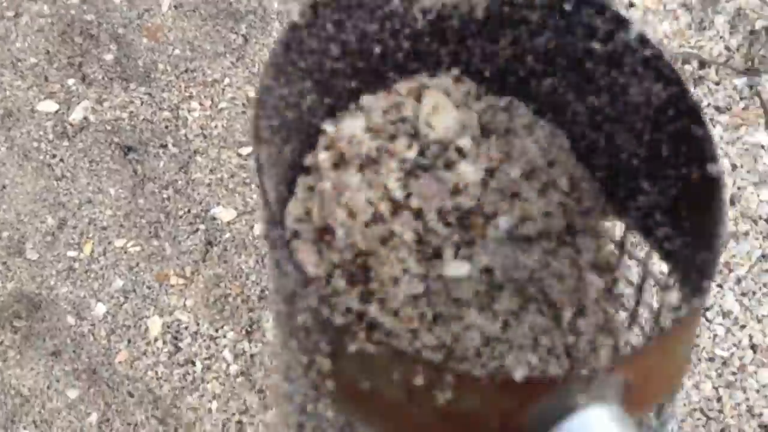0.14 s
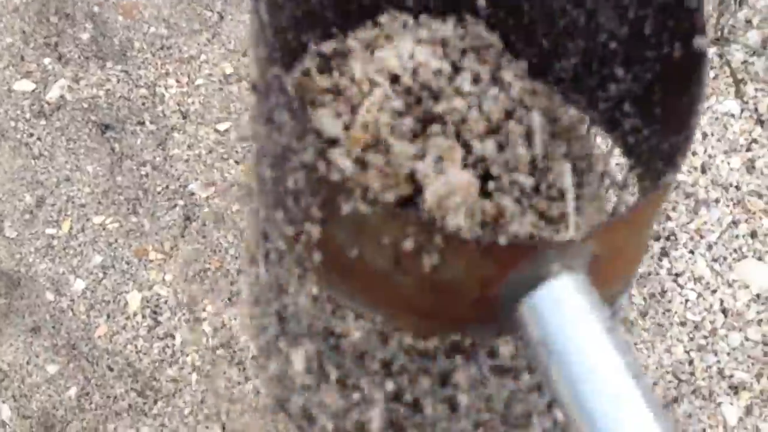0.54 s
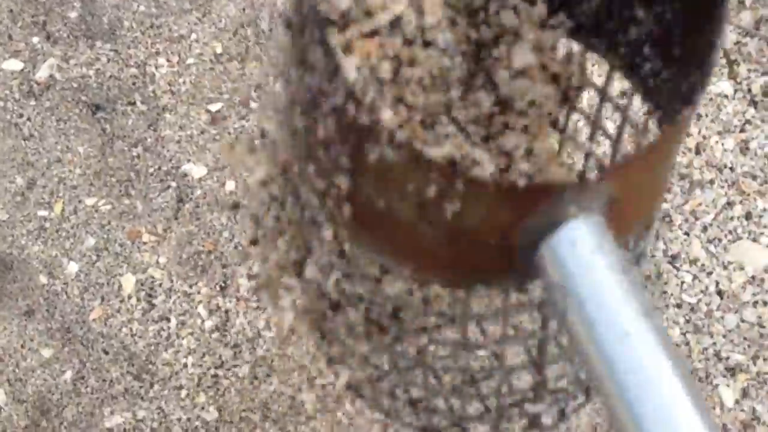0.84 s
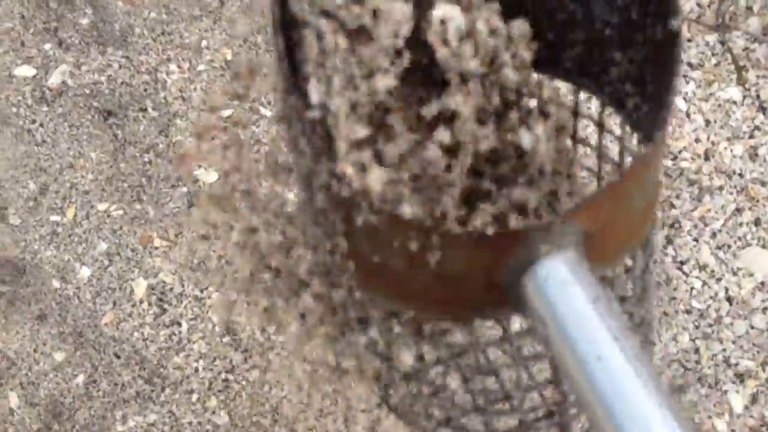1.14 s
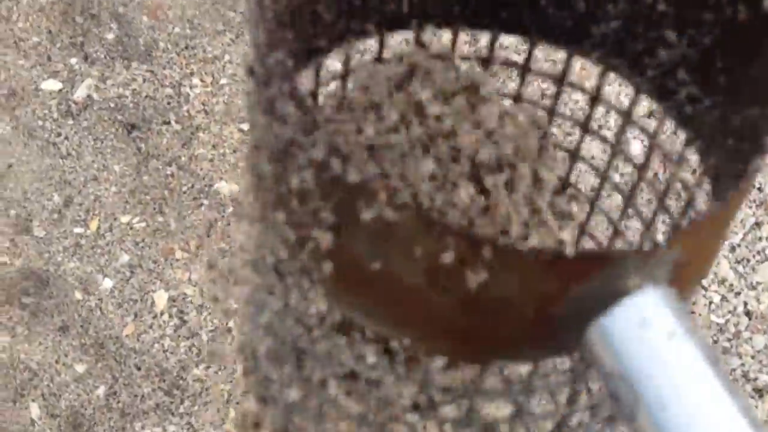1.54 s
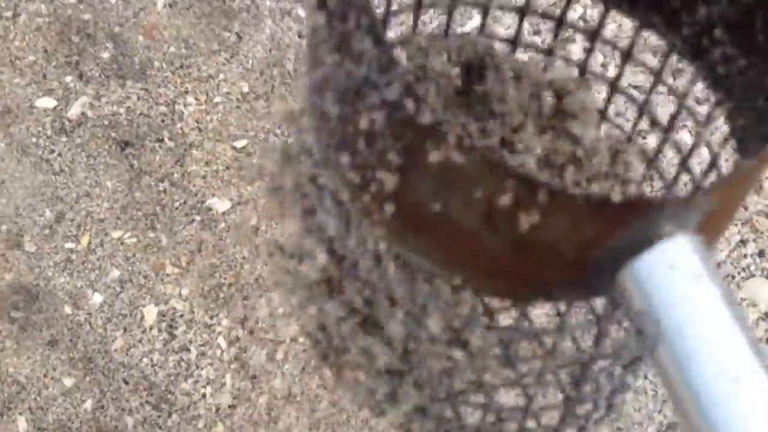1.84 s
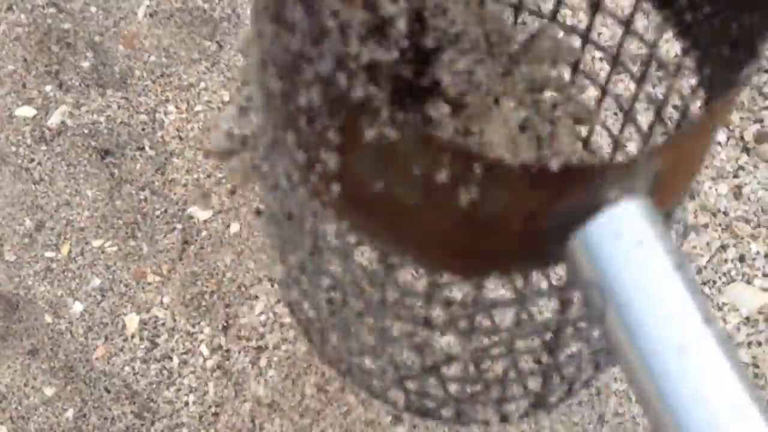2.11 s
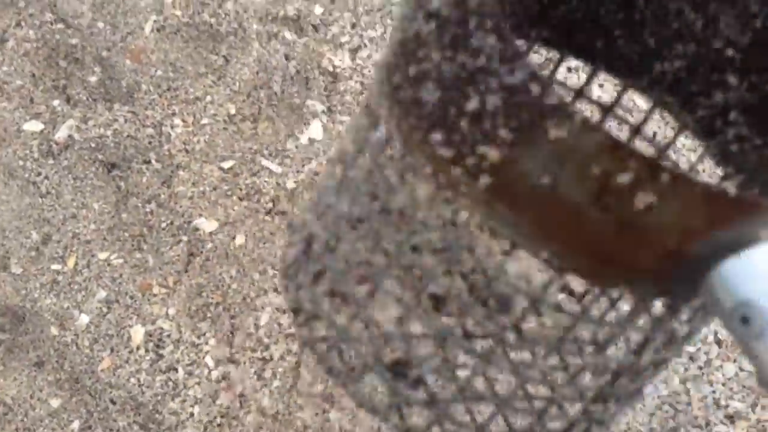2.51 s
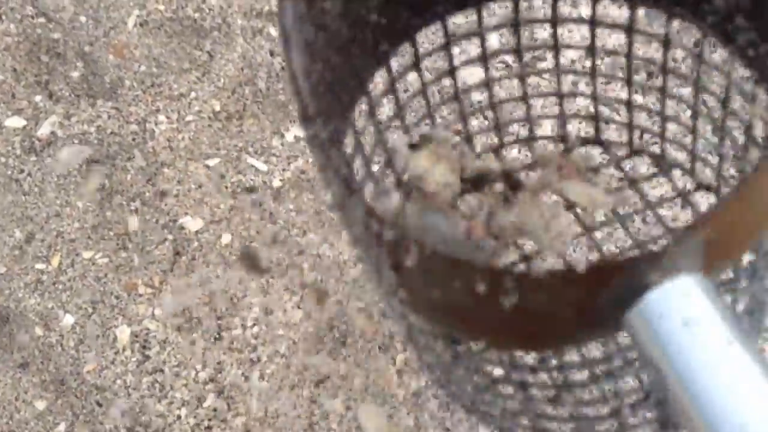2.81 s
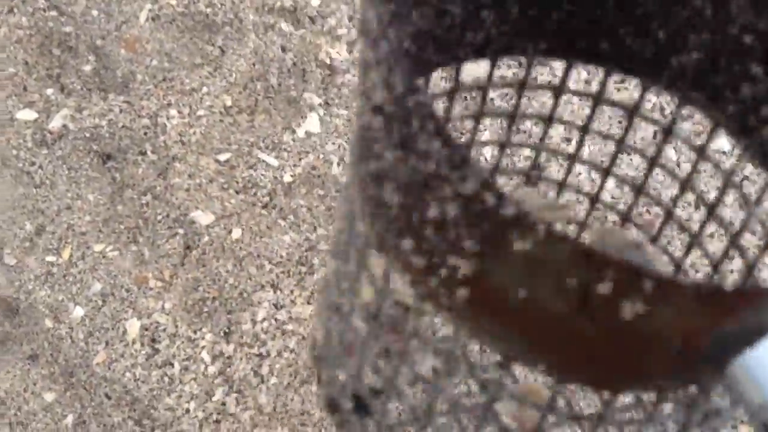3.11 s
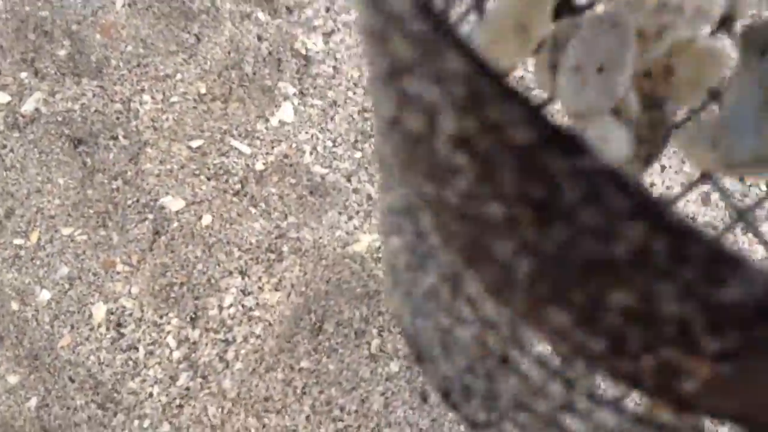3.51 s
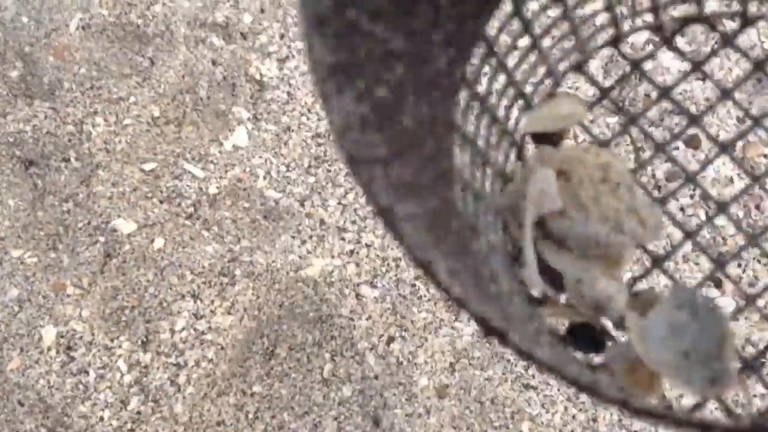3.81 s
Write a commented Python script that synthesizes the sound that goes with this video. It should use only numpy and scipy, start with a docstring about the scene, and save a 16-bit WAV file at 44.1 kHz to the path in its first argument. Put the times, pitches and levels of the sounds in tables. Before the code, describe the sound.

Coarse sand shaken in a steel mesh scoop in crunchy bursts, then shells rattling and clicking

```python
"""Sand and shells in a steel scoop

A steel mesh scoop is shaken close by on a beach. Nine times coarse sand slides back, is thrown against the
mesh and trickles through: dense random grains, coloured and swelled. Then the scoop is tilted and the shells
left in it tumble, as bunched grains and ticks. Fragments click as short modes with a noisy crack, and heavier
pieces knock on the wall. The basket rings faintly; behind lies a low rush of surf and air, as coloured noise.
"""
import sys
import numpy as np
from scipy import signal
from scipy.fft import rfft, irfft, next_fast_len
from scipy.io import wavfile
from scipy.ndimage import map_coordinates

SR = 44100
rng = np.random.default_rng(int(sys.argv[2]) if len(sys.argv) > 2 else 0)


def waveform_to_disk(signal):
    """Save audio, clipped to [-1, 1], as 16-bit WAV at the path in sys.argv[1]."""
    frames = np.transpose(np.atleast_2d(signal))
    scaled = np.clip(frames, -1, 1) * 32767
    samples = np.round(scaled).astype(np.int16)
    wavfile.write(sys.argv[1], SR, samples)


N = 174195  # length in samples

# Levels in the tables come before the layer trims (..._DB) further down.
# throws of sand against the mesh: centre_s, level_db, half_width_s
SAND_THROWS = [(0.102, -20, 0.01), (0.406, -15, 0.012), (.673, -20, 0.011), (0.962, -16.5, .016),
               (1.232, -17, 0.015), (1.504, -19.5, 0.02), (1.738, -17, 0.01), (1.994, -21.5, 0.024),
               (2.262, -20, .021)]
# sand sliding back before each throw: centre_s, level_db, half_width_s
SAND_SLIDES = [(.041, -40, 0.035), (0.32, -31.5, 0.031), (.613, -37.5, 0.036), (0.881, -30, 0.031),
               (1.154, -30, 0.03), (1.427, -31.5, 0.033), (1.663, -28.5, 0.024), (1.902, -33, 0.029),
               (2.165, -35.5, 0.029)]
# loudness of the shells rolling in the tilted scoop: time_s, level_db
TUMBLE_LEVEL = [(2.27, -59), (2.35, -45), (2.41, -28.5), (2.435, -35.5), (2.49, -27.5), (2.57, -37.5),
                (2.597, -30), (2.664, -37), (2.695, -25.5), (2.79, -36), (2.865, -37), (2.925, -31.5),
                (3.0, -31), (3.13, -27.5), (3.29, -29), (3.34, -36), (3.39, -31.5), (3.47, -36.5),
                (3.51, -29.5), (3.565, -35), (3.6, -20), (3.65, -24), (3.735, -26.5), (3.82, -24),
                (3.862, -35.5), (3.9, -27.5), (3.925, -39)]
# single fragments striking the basket: touch_s, peak_db, pitch_hz
FRAGMENT_CLICKS = [(0.0947, -13, 8170), (0.244, -27.5, 8200), (0.3748, -6.5, 7910), (0.3915, -14.5, 6900),
                   (0.442, -14.5, 7840), (0.656, -16, 11800), (0.7439, -14.5, 8100), (0.7563, -19.5, 8950),
                   (0.9305, -9.5, 8100), (0.946, -9, 4620), (1.0003, -12, 9200), (1.0166, -10.5, 7930),
                   (1.0537, -23, 8400), (1.2023, -13, 8060), (1.255, -7, 8800), (1.482, -11, 7660),
                   (1.5115, -10, 7400), (1.546, -10.5, 6450), (1.6127, -19.5, 4610), (1.7093, -14, 8600),
                   (1.718, -12, 8100), (1.902, -15.5, 4850), (1.961, -10, 13000), (1.9793, -8, 8100),
                   (2.089, -23, 3860), (2.2252, -11.5, 8400), (2.4632, -17, 6560), (2.539, -19.5, 2900),
                   (2.5905, -14, 2770), (2.6433, -20.5, 2220), (2.684, -8, 4850), (2.7098, -7, 5880),
                   (2.7192, -8, 8300), (2.761, -21, 3500), (2.833, -11, 11900), (2.9265, -10, 8700),
                   (3.0166, -10.5, 3180), (3.025, -15, 7630), (3.0475, -20, 4850), (3.0606, -14, 8800),
                   (3.085, -17, 4800), (3.1363, -13, 6960), (3.1933, -11, 8900), (3.2615, -15, 6960),
                   (3.295, -20, 6630), (3.392, -20, 3210), (3.422, -14.5, 4770), (3.4486, -24, 3220),
                   (3.4824, -20, 3050), (3.5023, -22, 3190), (3.5236, -9.5, 4400), (3.5625, -23, 4570),
                   (3.5888, -9.5, 6600), (3.6093, -16, 4540), (3.6378, -9, 6360), (3.648, -11, 5950),
                   (3.679, -13.5, 6700), (3.702, -13.5, 6600), (3.755, -11.5, 6660), (3.774, -7, 6720),
                   (3.791, -12, 6400), (3.8133, -15, 3060), (3.8994, -13.5, 8740)]
# heavier pieces knocking on the steel wall: start_s, peak_db, pitch_hz, clack_against_ring_db
WALL_KNOCKS = [(0.965, -32, 930, -2), (1.121, -27, 1940, -4), (1.235, -26.5, 2010, -5),
               (1.512, -25, 1050, 1), (1.546, -20.5, 2200, 4), (1.739, -29, 1070, -11),
               (2.01, -25, 2040, -3), (2.271, -24, 1100, -7), (2.681, -26, 1980, -15),
               (3.017, -20.5, 3300, -5), (3.524, -26.5, 1850, -8), (3.641, -27, 2010, -9),
               (3.815, -21.5, 2040, -6)]
# ways the steel scoop vibrates: pitch_hz, level_db, t60_s (time to fall by 60 dB)
SCOOP_MODES = [(940, -5.5, 0.057), (1080, -2.5, 0.098), (1450, -7, 0.045), (2015, 3, 0.056),
               (2380, -7.5, 0.032), (2850, -1.5, 0.052), (3450, -4.5, 0.027), (4140, 3, 0.022),
               (4800, 7, 0.029)]
# tone colours of the layers: frequency_hz, gain_db
THROWN_SAND_COLOUR = [(300, -33.5), (900, -16.5), (1700, -13.5), (3000, -5.5), (4600, -1.5), (5200, -4.5),
                      (6300, -1), (8200, 3), (10300, -3.5), (12600, 2.5), (15500, -8)]
SLIDING_SAND_COLOUR = [(300, -12), (900, -3), (1700, -6.5), (3000, 0), (4600, 1.5), (5200, 0), (6500, 0),
                       (8200, 3.5), (10300, -2), (12600, 4.5), (15500, -6)]
SHELL_COLOUR = [(150, -45), (400, -11.5), (900, -10.5), (1600, -9.5), (2900, -2), (4400, 1), (5250, -4),
                (6500, -0.5), (8300, -2.5), (10300, -8), (12800, -8), (15500, -16)]
SURF_COLOUR = [(25, -23), (75, -31), (132, -8), (213, 0.5), (355, -1), (517, -3.5), (700, -8), (1170, -10),
               (1980, -120)]
AIR_COLOUR = [(300, -19.5), (700, -7), (1100, 5), (2200, 1), (5000, -16), (15000, -41)]
# loudness of the surf: time_s, level_db
SURF_LOUDNESS = [(0, -44), (1.8, -47), (2.08, -52), (2.6, -49.5), (3.2, -50), (3.7, -45.5), (3.95, -48.5)]
# level of the last grit against the shells: time_s, level_db
GRIT_LEVEL = [(2.3, -2), (3.15, 0.5), (3.35, -11), (3.55, -20), (3.65, -4), (3.95, -11)]

# Surf and air
AIR_DB = -49
SURF_WAVER_DB, SURF_WAVER_PER_S = 0.54, 6.86  # quick swell and ebb of the rush
# Sand
GRAINS_PER_S, GRAIN_SPREAD_DB = 12000, 6
THROW_DB, SLIDE_DB = -1, 1.5
CHIPS_IN_THROW_DB, CHIPS_IN_SLIDE_DB = -9, -6
TRICKLE_DB, TRICKLE_RISE_S, TRICKLE_FALL_S = -7, 0.01, 0.022  # stray grains around each throw
SLIDE_SQUARENESS = 2.26  # above 2 a slide starts and stops more abruptly than a bell curve
# Shell chips
CHIPS_PER_S, CHIP_SPREAD_DB = 500, 3
CHIP_HZ, CHIP_CYCLES = 5460, 3.3  # central pitch; cycles until a tick fades to 37 %
CHIP_MODE_SPREAD, CHIP_PITCH_SPREAD = 0.447, 0.262  # log scatter of pitch within a chip and between chips
CHIP_LIMIT = 1.6  # largest chip, in standard deviations of size
# Tumbling shells
SCRAPE_DB, CHIP_DB = -4.5, -6.5
BUMPS_PER_S, BUMP_FALL_S, BUMP_SPREAD_DB = 130, 0.0047, 3.5  # collisions that bunch the rattle
BUMP_SHARE = 0.62  # part of the power that follows the collisions
# Clicks; crack and ring times are for a piece at the reference pitch
CLICK_T60_S, CRACK_DB, CRACK_T60_S = 0.012, -8, 0.0066
CHATTER_DB, CHATTER_T60_S = -27, 0.032
CLICK_REFERENCE_HZ, CLICK_SIZE_LAW = 7000, 0.43  # bigger pieces sound lower and crack for longer
CLICK_SPREAD, CLICK_DELAY_S = 0.162, 0.001  # log scatter of a fragment's modes; from touch to crack
CLICK_ATTACK_S, CLICK_LOW_HZ = 0.00017, 700  # rise time; bass cut
# Knocks
KNOCK_DB = 1.5
CLACK_LOW, CLACK_HIGH = 0.73, 1.63  # band of a clack, times its pitch
KNOCK_FOCUS_DB, KNOCK_ATTACK_S = 5.5, 0.00087  # loss per octave away from the pitch; rise time
CLACK_T60_S, KNOCK_DAMP_T60_S = 0.019, 0.17  # the piece's own dry clack; the load muffles the ring
# Basket
RING_DB = -15
SHIFT_S, LOAD_DETUNE = 0.1994, 0.021  # the load shifts this often; share by which it detunes the basket
MODE_SPREAD_DB = 2.44  # scatter of the mode levels from one ring to the next
# Limits of the whole sound
LOW_CUT_HZ, TOP_HZ = 80, 15700


def amp(db):
    """Turn decibels into an amplitude factor."""
    return 10 ** (np.asarray(db) / 20)


def unit(x):
    """Scale a sound to rms 1."""
    return x / np.sqrt(np.mean(x ** 2) + 1e-20)


def curve(rows):
    """One value per sample from (time, value) points."""
    return np.interp(np.arange(N) / SR, *np.transpose(rows))


def colour(x, points):
    """Filter a sound to the gains of the (Hz, dB) points, with no echo ahead of it."""
    m = next_fast_len(N + SR // 2, True)
    f, db = np.transpose(points)
    log_hz = np.log(np.fft.rfftfreq(m, 1 / SR) + 1)
    gain = amp(np.interp(log_hz, np.log(f), db))
    # Folding the cepstrum forward in time makes the filter causal (minimum phase)
    cepstrum = irfft(np.log(gain), m)
    cepstrum[1:m // 2] *= 2
    cepstrum[m // 2 + 1:] = 0
    return irfft(rfft(x, m) * np.exp(rfft(cepstrum)), m)[:N]


def decay(t, t60):
    """Exponential fade that falls by 60 dB in t60 seconds."""
    return np.exp(-np.log(1000) * t / t60)


def add(track, s, sound):
    """Mix a sound into the track at time s."""
    part = track[max(round(s * SR), 0):][:len(sound)]
    part += sound[:len(part)]


def beach():
    """A low, wavering rush of surf with a faint airy hiss, both coloured noise."""
    knots = rng.standard_normal(int(N / SR * SURF_WAVER_PER_S) + 4)
    waver = map_coordinates(knots, [np.arange(N) / SR * SURF_WAVER_PER_S])  # smooth path through the knots
    surf = unit(colour(rng.standard_normal(N), SURF_COLOUR))
    air = unit(colour(rng.standard_normal(N), AIR_COLOUR))
    return amp(curve(SURF_LOUDNESS) + SURF_WAVER_DB * waver) * surf + amp(AIR_DB) * air


def scoop_ring(pitch_hz=2000, focus_db=0):
    """One contact's ring: the load detunes the modes, and the spot hit favours those near one pitch."""
    t = np.arange(SR // 6) / SR
    ring = np.zeros(len(t))
    for hz, db, t60 in SCOOP_MODES:
        level = amp(db + rng.normal(0, MODE_SPREAD_DB) - focus_db * abs(np.log2(hz / pitch_hz)))
        detuned_hz = hz * (1 + LOAD_DETUNE * rng.standard_normal())
        ring += level * decay(t, t60) * np.sin(2 * np.pi * (detuned_hz * t + rng.random()))
    return ring


def basket(load):
    """The load drives the basket, which rings a little differently each time the load shifts."""
    out, shifts = np.zeros(N), np.arange(N) / SR / SHIFT_S
    for k in range(int(shifts[-1]) + 2):
        ring = scoop_ring()
        share = np.sqrt(np.maximum(1 - abs(shifts - k), 0))  # crossfade between neighbouring rings
        out += signal.oaconvolve(load * share, ring / np.linalg.norm(ring))[:N]
    return out


def knocks():
    """Heavier pieces clack on the wall and set the loaded basket ringing briefly."""
    out = np.zeros(N)
    for s, db, hz, clack_db in WALL_KNOCKS:
        ring = scoop_ring(hz, KNOCK_FOCUS_DB)
        t = np.arange(len(ring)) / SR
        band = [CLACK_LOW * hz, min(CLACK_HIGH * hz, SR / 3)]
        b, a = signal.butter(2, band, "bandpass", fs=SR)
        clack = unit(signal.lfilter(b, a, rng.standard_normal(len(t))))
        ring = ring / np.abs(ring).max() * decay(t, KNOCK_DAMP_T60_S)
        hit = ring + amp(clack_db) * clack * decay(t, CLACK_T60_S)
        hit = hit * (1 - np.exp(-t / KNOCK_ATTACK_S))
        add(out, s, amp(db + KNOCK_DB) * hit / np.abs(hit).max())
    return out


def clicks():
    """A fragment lands: a crack, short close modes and a little chatter; it is too small to give bass."""
    out, t = np.zeros(N), np.arange(SR // 20) / SR
    grit = unit(colour(rng.standard_normal(N), THROWN_SAND_COLOUR))
    for s, db, hz in FRAGMENT_CLICKS:
        size = (CLICK_REFERENCE_HZ / hz) ** CLICK_SIZE_LAW
        modes_hz = hz * np.exp(CLICK_SPREAD * rng.standard_normal((6, 1)))
        tones = np.sin(2 * np.pi * (modes_hz * t + rng.random(modes_hz.shape)))
        ring = tones.mean(0) * decay(t, CLICK_T60_S * size)
        crack = amp(CRACK_DB) * decay(t, CRACK_T60_S * size)
        chatter = amp(CHATTER_DB) * decay(t, CHATTER_T60_S)
        noise = np.roll(grit, rng.integers(N))[:len(t)]  # a random stretch of the grit
        hit = (ring + (crack + chatter) * noise) * (1 - np.exp(-t / CLICK_ATTACK_S))
        add(out, s + CLICK_DELAY_S, amp(db) * hit / np.abs(hit).max())
    return signal.sosfilt(signal.butter(2, CLICK_LOW_HZ, "highpass", fs=SR, output="sos"), out)


def grains():
    """Dense tiny impacts of unequal size, rms 1."""
    hit = rng.random(N) < GRAINS_PER_S / SR
    sign = np.sign(rng.standard_normal(N))
    size = amp(GRAIN_SPREAD_DB * np.minimum(rng.standard_normal(N), 2))
    return unit(hit * sign * size)


def chips():
    """Shell chips colliding at random, each a dry tick of several unrelated modes, rms 1."""
    count = int(CHIPS_PER_S * N / SR)
    start = rng.integers(0, N, count)[:, None]
    size, pitch, *modes = rng.standard_normal((count, 7)).T[:, :, None]  # five modes per chip
    k = np.arange(SR // 250)
    ticks = 0
    for mode in modes:
        hz = CHIP_HZ * np.exp(CHIP_PITCH_SPREAD * pitch + CHIP_MODE_SPREAD * mode)
        hz = np.clip(hz, 1200, TOP_HZ)
        cycles = hz * k / SR
        level = rng.choice([-1, 1], (count, 1)) * np.sqrt(hz)
        ticks = ticks + level * np.exp(-cycles / CHIP_CYCLES) * np.sin(2 * np.pi * cycles)
    ticks = ticks * amp(CHIP_SPREAD_DB * np.minimum(size, CHIP_LIMIT))
    return unit(np.bincount((start + k).ravel(), ticks.ravel(), N)[:N])  # sum the overlapping ticks


def bumps():
    """Random collisions, each a sudden rise and quick fall of the rattle, rms 1."""
    strength = amp(BUMP_SPREAD_DB * np.minimum(rng.standard_normal(N), 1)) ** 2
    hit = (rng.random(N) < BUMPS_PER_S / SR) * strength
    power = signal.lfilter([1], [1, -np.exp(-1 / (BUMP_FALL_S * SR))], hit)
    return np.sqrt(1 - BUMP_SHARE + BUMP_SHARE * power / power.mean())


def tumble():
    """The remaining shells scrape and bump over each other, mixed with the last grit."""
    grit = amp(curve(GRIT_LEVEL)) * unit(colour(grains(), THROWN_SAND_COLOUR))
    scrape = amp(SCRAPE_DB) * unit(colour(grains(), SHELL_COLOUR))
    rattle = amp(CHIP_DB) * unit(colour(chips(), SHELL_COLOUR))
    return amp(curve(TUMBLE_LEVEL)) * bumps() * (grit + scrape + rattle)


def coarse_sand(spectrum, chips_db):
    """Grains mixed with some shell chips and given one tone colour, rms 1."""
    return unit(colour(grains() + amp(chips_db) * chips(), spectrum))


def sand():
    """Each shake is a soft slide, then a throw with a trickle around it; their powers add up."""
    t = np.arange(N) / SR
    thrown, sliding = np.zeros(N), np.zeros(N)  # power over time
    for s, db, width in SAND_THROWS:
        u = t - s
        trickle_shape = np.exp(-np.maximum(u / TRICKLE_FALL_S, -u / TRICKLE_RISE_S))
        trickle = amp(TRICKLE_DB) ** 2 * trickle_shape
        thrown += amp(db) ** 2 * (np.exp(-(u / width) ** 2) + trickle)
    for s, db, width in SAND_SLIDES:
        sliding += amp(db) ** 2 * np.exp(-abs((t - s) / width) ** SLIDE_SQUARENESS)
    throws = np.sqrt(thrown) * coarse_sand(THROWN_SAND_COLOUR, CHIPS_IN_THROW_DB)
    slides = np.sqrt(sliding) * coarse_sand(SLIDING_SAND_COLOUR, CHIPS_IN_SLIDE_DB)
    return amp(THROW_DB) * throws + amp(SLIDE_DB) * slides


def scene():
    """Sand, tumbling shells and clicks also ring the basket faintly; knocks carry their own ring."""
    load = sand() + tumble() + clicks()
    return (load + knocks() + beach() + amp(RING_DB) * basket(load))[None]


def record(dry):
    """Thin the deep bass and keep nothing above the top frequency."""
    m = next_fast_len(N + SR // 2)
    hz = np.fft.rfftfreq(m, 1 / SR)
    bass_cut = hz ** 2 / np.hypot(hz ** 2, LOW_CUT_HZ ** 2)
    return irfft(rfft(dry, m) * bass_cut * (hz < TOP_HZ), m)[..., :N]


dry = scene()
out = record(dry)
waveform_to_disk(out)
```